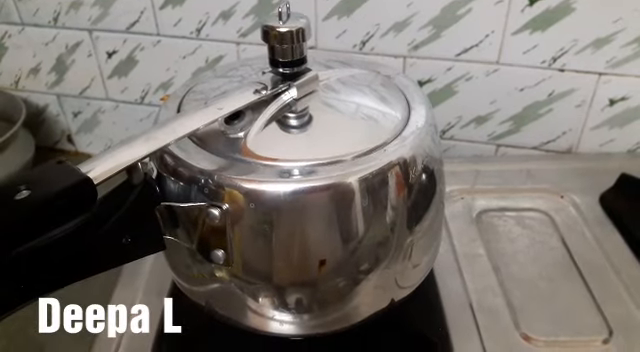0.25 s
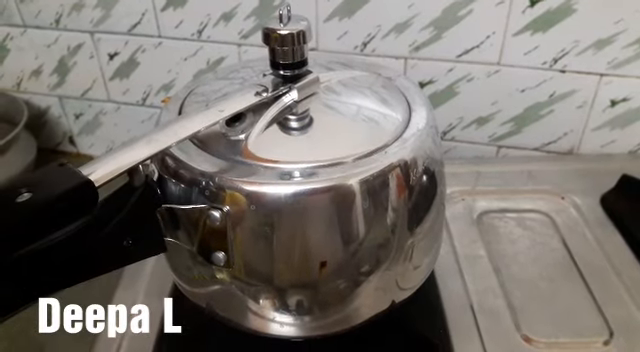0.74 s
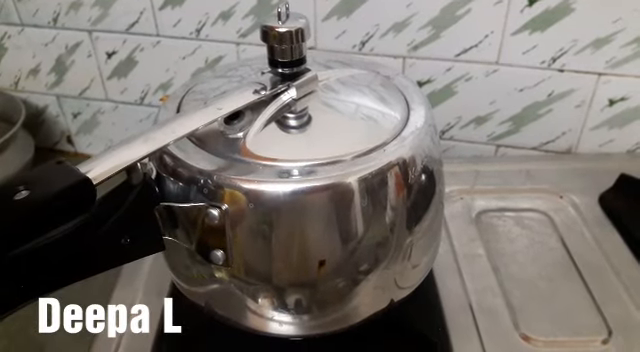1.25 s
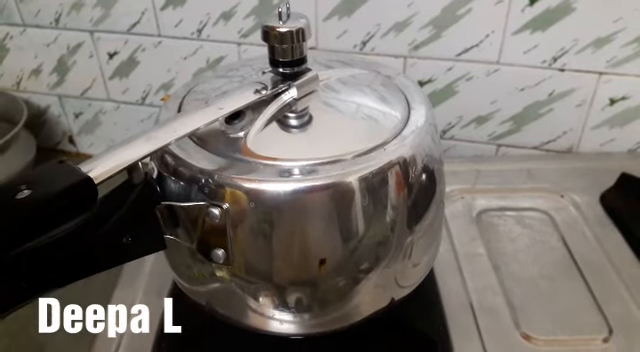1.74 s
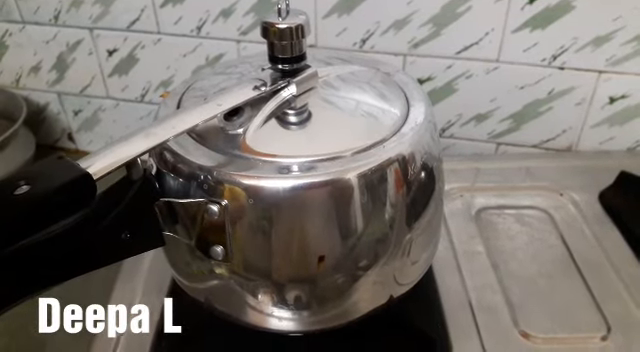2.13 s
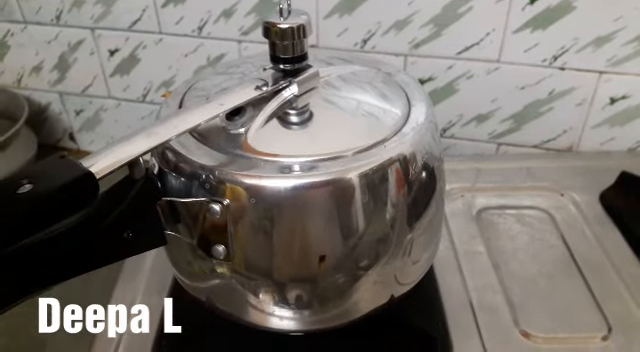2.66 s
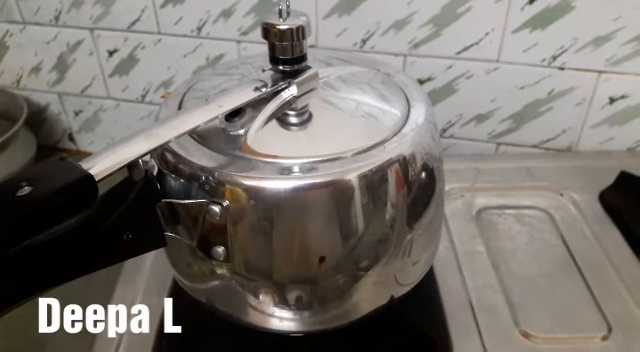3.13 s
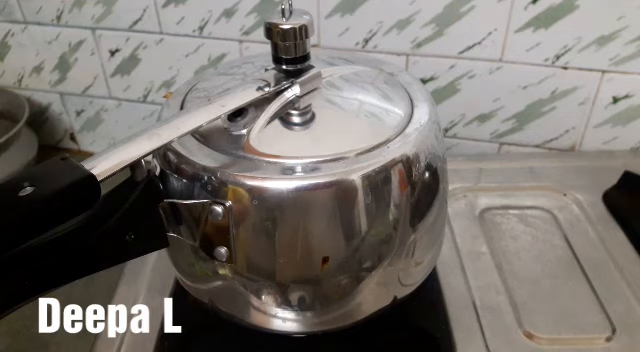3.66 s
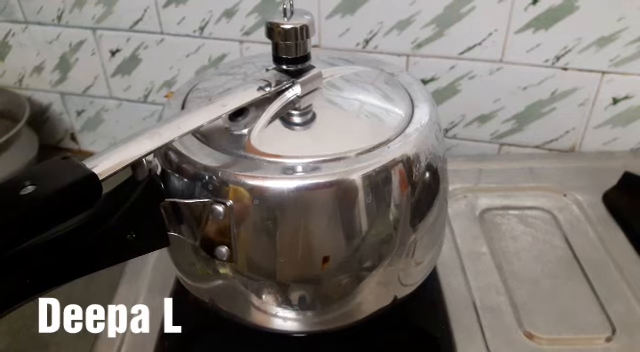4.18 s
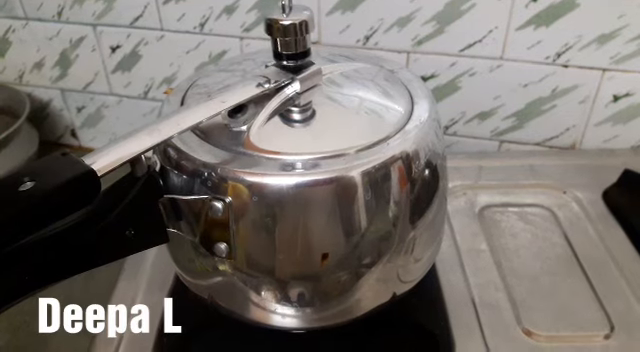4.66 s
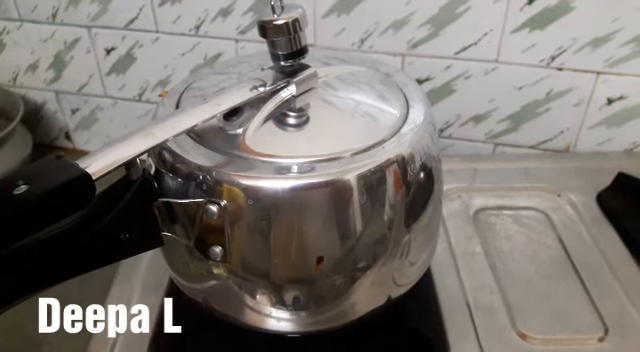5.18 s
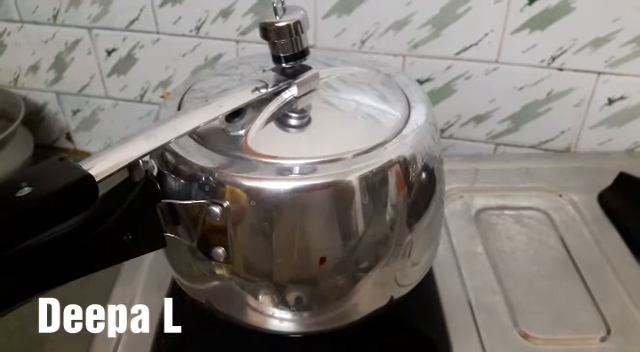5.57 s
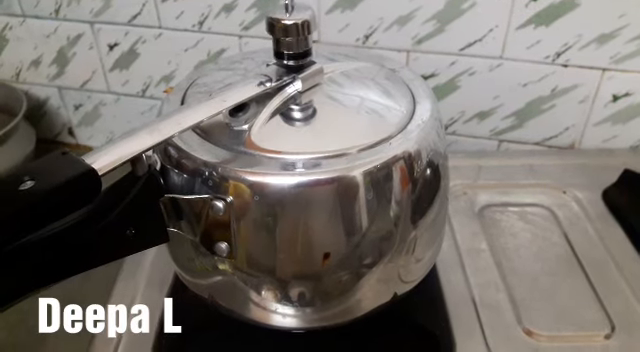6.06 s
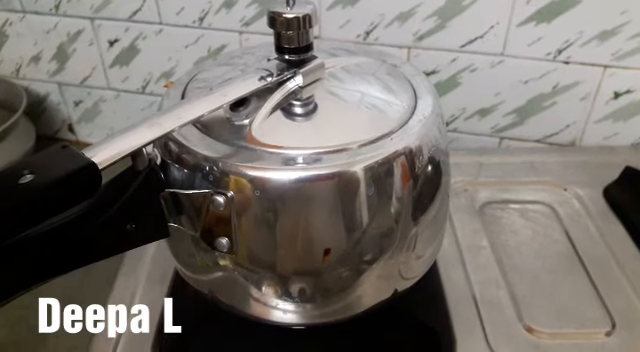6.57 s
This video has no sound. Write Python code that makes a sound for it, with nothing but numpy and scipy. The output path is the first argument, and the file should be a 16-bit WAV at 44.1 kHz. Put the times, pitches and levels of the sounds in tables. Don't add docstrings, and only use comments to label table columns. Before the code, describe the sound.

A phone microphone close to the vent picks up leaking steam, soft flame rumble, a few metallic pan taps and sharp wet spits. The hiss rocks in swelling puffs, then opens into a bright, roaring blast for over a second, full of crackling, buffeting thumps. The weight drops shut with a low bump; faint hiss and small drips remain, turned down, in a short hard-walled kitchen echo.

```python
import sys
import numpy as np
from scipy import signal
from scipy.fft import rfft, irfft, next_fast_len
from scipy.io import wavfile
from scipy.ndimage import uniform_filter1d, map_coordinates

SR = 44100
rng = np.random.default_rng(int(sys.argv[2]) if len(sys.argv) > 2 else 0)


def makeup_ratio(level_db):
    decades = np.asarray(level_db, float) / 20
    return 10 ** decades


def bounce(signal):
    frames = np.transpose(np.atleast_2d(signal))
    limited = np.clip(frames, -1, 1)
    pcm = np.round(limited * 32767).astype(np.int16)
    wavfile.write(sys.argv[1], SR, pcm)


N = 300331

# frequency [Hz], level [dB per Hz].
ROAR = [(850, -37.0), (1380, -14.5)] + [(1000, -37), (1700, -6.5), (2090, -6.0), (2350, 1), (3000, -9.5),
        (4190, -11), (4730, -11.5), (5050, -8.0), (5800, -6.5), (6430, -1.5), (7120, -3), (8040, -9),
        (12600, -12), (15700, -14.5)][1:]
# frequency [Hz], width [Hz], boost
# [dB].
CAVITY = [(2340, 140, 1.6), (5157, 82, 5), (6680, 200, 0), (7300, 150, 2), (12700, 1000, 4)]
# time [s], jet level [dB], level of its top end [dB].
PRESSURE = [(0, -35.5, -20), (.09, -40.5, -9), (.15, -39, -9), (.32, -43, -7.5), (2.1, -43, -7),
            (3.3, -42, -8), (3.58, -38.5, -9.5), (3.94, -38.5, -9), (4.3, -36.5, -11.5), (4.6, -35.5, -9),
            (5.2, -41, -11), (6.2, -43, -9), (6.44, -43, -13), (6.81, -41, -14)]

OPEN_S, SHUT_S = 4.85, 6.135


def unit(x):
    return x / np.sqrt(np.mean(x ** 2) + 1e-20)


def along(points, hz):
    f, v = np.transpose(points)
    return np.interp(np.log(hz + 1), np.log(f + 1), v)


def curves(rows):
    s, *columns = np.transpose(rows)
    return [np.interp(np.arange(N) / SR, s, column) for column in columns]


def swells(rows, floor_db, t):
    power = makeup_ratio(2 * floor_db)
    power = power + sum(makeup_ratio(2 * db - 20 * ((t - s) / np.where(t < s, rise, fall)) ** 2)
                        for s, db, rise, fall in rows)
    return 10 * np.log10(power)


def wobble(rate):
    knots = rng.standard_normal(int(N * rate / SR) + 4)
    return map_coordinates(knots, [np.arange(N) * rate / SR])


def filtered(x, response):
    m = next_fast_len(N + SR // 2)
    return irfft(rfft(x, m) * response(np.fft.rfftfreq(m, 1 / SR)), m)[..., :N]


def patchy(patchy_db):
    z = signal.stft(rng.standard_normal(N), nperseg=512)[2]
    field = uniform_filter1d(rng.standard_normal(z.shape), 6, 0)
    field = uniform_filter1d(field, 10, 1)
    return signal.istft(z * makeup_ratio(patchy_db * unit(field)), nperseg=512)[1][:N]


def room(x, wet_db):
    # frequency [Hz], time to fall by 60 dB [s].
    kitchen = [(500, 0.88), (3000, 0.26), (12000, 0.26)]
    hz, t, z = signal.stft(rng.standard_normal(SR // 2), SR, nperseg=256)
    decay = makeup_ratio(-60 * t / along(kitchen, hz)[:, None])
    tail = signal.istft(z * decay, SR, nperseg=256)[1]
    delayed = np.pad(x, (130, 0))
    return x + makeup_ratio(wet_db) * signal.fftconvolve(delayed, tail / np.linalg.norm(tail))[:N]


def vent(x, spectrum, peaks):
    # frequency [Hz], width [Hz], change [dB].
    lid_dips = [(4020, 110, -5), (4340, 140, -9)]

    def response(f):
        bumps_db = sum(db / (1 + ((f - c) / w * 2) ** 2) for c, w, db in peaks + lid_dips)
        return makeup_ratio(along(spectrum, f) + bumps_db)

    return filtered(x, response)


def duck_db():
    start_s, length_s, depth_db = 4.705, .06, -12.5
    return depth_db * np.clip((np.arange(N) / SR - start_s) / length_s, 0, 1)


def valve():
    # time [s], peak [dB], rise [s], fall [s].
    surges = [
        (2.44, -43, 0.14, .1),
        (2.815, -43.5, 0.034, .08),
        (3.064, -41, 0.079, 0.072),
        (3.5, -38, 0.19, 0.052),
        (3.816, -33.5, 0.21, 0.081),
        (4.15, -29.5, 0.15, 0.19),
        (4.44, -30, 0.14, 0.18),
        (5.5, -21, .25, 0.13),
        (6.615, -52, .008, 0.045),
    ]
    blast_level_db, kick_db, kick_s, sag_db_per_s = -16.5, 2.5, 0.11, 0.9
    rise_db_per_s, fall_db_per_s = 79, 217
    unstick_s, unstick_db_per_s = 4.65, 202
    surge_brighter_db = 4

    t = np.arange(N) / SR
    leak_db, top_db = curves(PRESSURE)
    leak_db = leak_db + duck_db()
    since = t - OPEN_S
    blast_db = blast_level_db + kick_db * np.exp(-np.maximum(since, 0) / kick_s)
    blast_db = blast_db + np.minimum(rise_db_per_s * since, -sag_db_per_s * since)
    blast_db = blast_db - fall_db_per_s * np.maximum(t - SHUT_S, 0)
    blast_db = blast_db - unstick_db_per_s * np.maximum(unstick_s - t, 0)
    jet_db = 10 * np.log10(makeup_ratio(2 * swells(surges, leak_db, t)) + makeup_ratio(2 * blast_db))
    beyond_leak = 1 - makeup_ratio(2 * (leak_db - jet_db))
    return jet_db, top_db + surge_brighter_db * beyond_leak


def steam():
    # frequency [Hz], level [dB per Hz].
    leak_colour = [(530, -33), (900, -33), (1040, -13), (1210, -25), (1320, -13.5), (2080, -5.5), (2340, 0),
                   (2610, -9.5), (2800, -8.5), (3280, -16.5), (4420, -16.5), (6800, -6.5), (8840, -16.5),
                   (12100, -19.5), (15700, -17.5)]
    # frequency [Hz], width [Hz], change [dB].
    seat_gap = [(7500, 340, 4.5), (7880, 280, -9), (12500, 360, -7), (14300, 300, -10), (15150, 400, 2)]
    jet_db, top_db = valve()
    flow = np.clip((jet_db + 43.0) / 18, 0, 1)
    air = room(patchy(patchy_db=1.2) * makeup_ratio(0.57 * wobble(300)), wet_db=-10.5)
    leak = unit(vent(air, leak_colour, CAVITY + seat_gap))
    roar = unit(vent(air, ROAR, CAVITY))
    jet = (1 - flow) * leak + flow * roar
    top = filtered(jet, lambda f: 1 / (1 + (9000 / (f + 1)) ** 8))
    top_gain = makeup_ratio(top_db + 10 - 1.17 * flow)
    return makeup_ratio(jet_db + 0.5 * wobble(12)) * (jet + (top_gain - 1) * top)


def stove():
    # frequency [Hz], level [dB per Hz].
    rumble_colour = [(20, -16), (45, -17.0)] + [(41, -37), (70, -5.5), (141, -0.5), (193, -10.5), (265, -2),
                     (397, -6.5), (640, -9.5), (900, -7.5), (1300, -9.5), (1690, -36), (2860, -120)][1:]
    # frequency [Hz], width [Hz], level [dB].
    flame_tones = [(148, 24, -6), (240, 14, -8), (268, 15, 0), (352, 20, -8), (438, 8, -12)]
    # time [s], peak [dB], rise [s], fall [s].
    flares = [(.15, -53.5, 0.18, .15), (.55, -49, .3, 0.28), (1.24, -53.5, 0.11, 0.23),
              (1.63, -54.5, 0.069, 0.18), (2.02, -53.5, .09, .13), (2.57, -51, .06, 0.14),
              (2.82, -49, 0.08, 0.089), (3.08, -53.5, .12, 0.61), (3.76, -52, 0.33, .4),
              (4.42, -50.5, 0.14, 0.041), (4.6, -49.5, 0.036, .1), (6.185, -33, .04, .08),
              (6.66, -52, .03, .15)]
    # time [s], peak [dB], rise [s], fall [s].
    settling = [
        (6.175, -44.5, 0.048, 0.099),
    ]
    quiet_rumble_db, rumble_per_leak_db, quiet_hum_db = -54, 0.66, -69.5

    t = np.arange(N) / SR
    leak_db = curves(PRESSURE)[0]
    rumble_db = quiet_rumble_db + rumble_per_leak_db * (leak_db - leak_db.min())
    rumble_db = rumble_db + 1.2 * wobble(4.1) + duck_db()
    rumble = unit(filtered(patchy(patchy_db=1.5), lambda f: makeup_ratio(along(rumble_colour, f))))

    def hum_response(f):
        return sum(makeup_ratio(db) * f * w / np.hypot(c * c - f * f, f * w) for c, w, db in flame_tones) ** 2

    hum_db = swells(flares, quiet_hum_db, t) + duck_db()
    hum = unit(filtered(rng.standard_normal(N), hum_response))
    above_300_hz = filtered(rumble, lambda f: 1 / (1 + (300 / (f + 1)) ** 8))
    settle = makeup_ratio(swells(settling, -120, t)) * above_300_hz
    return settle + makeup_ratio(rumble_db) * rumble + makeup_ratio(hum_db) * hum


def clanks():
    # time [s], level [dB].
    touch_lists = [
        [(.008, -31)],
        [(.02, -30.5), (.05, -35), (.07, -36)],
        [(.04, -35), (.05, -29), (.066, -30.5), (.08, -45), (.096, -27), (2.63, -38.5)],
        [(.202, -28), (.214, -27), (.225, -31)],
        [(3.29, -40), (3.35, -35), (3.44, -35.5), (3.74, -40)],
    ]
    # frequency [Hz], level [dB], time to fall by 60 dB [s].
    pans = [
        [(140, 0, .12), (680, -4, .05), (870, -4, .05), (4330, -8, .15), (4570, -6, .12), (4700, -8, .12)],
        [(1740, 0, .12), (2000, -5, .08), (2290, -2, .12)],
        [(910, -1, .06), (965, 1, .06), (1080, -5, .05)],
        [(1650, -2, .05), (1863, 2, .05), (2000, 1, .05), (2120, -3, .05), (2410, 1, .07), (2540, -3, .05)],
        [(727, 0, .16)],
    ]
    x, t = np.zeros(N), np.arange(SR // 2) / SR
    onset = 1 - np.exp(-t / 0.0022)
    for touches, tones in zip(touch_lists, pans):
        for s, db in touches:
            ring = np.zeros(len(t))
            for hz, level, t60 in tones:
                fade = makeup_ratio(level + rng.normal(0, 2) - 60 * t / t60)
                ring += fade * np.sin(2 * np.pi * hz * rng.normal(1, .008) * t)
            x[round(s * SR):][:len(t)] += makeup_ratio(db - 6.0) * ring * onset
    return room(x, wet_db=-5)


def spits():
    # time [s], peak [dB], width of colour [dB], puff [dB].
    droplets = [(0.0126, -29, 2, -30), (0.109, -23.5, -2, -10), (.1211, -22, 1, -6),
                (0.1242, -19, -2, -7.5), (0.153, -26, -2, -6), (.1794, -30, 4, -11), (.2288, -29, 0, -10),
                (2.28, -33, 5, -7), (2.368, -24, -2, -7), (2.376, -20, -4, -16), (2.4263, -28, -7, -15),
                (2.4567, -21.5, -1.5, -7.5), (2.591, -29.5, -1.5, -8), (2.6109, -28.5, 0, -9),
                (2.801, -22, -3, -4), (3.3387, -22, 3, -5), (3.4362, -20.5, 3, -9),
                (3.4395, -13.5, -15, -14), (3.5157, -24, 1, -17), (3.5189, -13, -2.5, -18),
                (3.523, -23, .6, -18), (3.5484, -31, .6, -10), (3.592, -22, -9, -14), (3.6322, -24, 2, -10),
                (3.7336, -27, -2, -7)]
    # time [s], peak [dB], width of colour [dB].
    drips = [(6.4601, -46, 0), (6.491, -42, -8), (6.5314, -39, -10), (6.5399, -34, -7), (6.5868, -39, -5),
             (6.6073, -33, -4), (6.619, -38, -6), (6.6252, -38, -8), (6.6285, -31, -10),
             (6.6374, -32, -8.5), (6.6746, -27.5, -4), (6.731, -40, 3), (6.775, -44, -0.5)]
    drip_puff_db, low_db, top_db = -9.5, -10.5, -16.5

    parts = np.zeros((3, N + SR))
    t = np.arange(SR // 8) / SR
    for s, db, wide_db, puff_db in droplets + [(*drip, drip_puff_db) for drip in drips]:
        envelope = makeup_ratio(-60 * t / 0.019) + makeup_ratio(puff_db - 60 * t / 0.18)
        burst = envelope * rng.standard_normal(len(t))
        band_db = np.c_[[low_db + wide_db, 0, top_db + wide_db]]
        parts[:, round(s * SR):][:, :len(t)] += makeup_ratio(db - 2.5 + band_db) * burst

    def under(f, edge_hz):
        return 1 / (1 + (f / edge_hz) ** 8)

    def bands(f):
        middle = under(f, 6870) - under(f, 4500)
        return np.array([1.4 * under(f, 3800), middle, 3.2 * (1 - under(f, 7900))])

    scale = np.std(vent(rng.standard_normal(N), ROAR, CAVITY))
    bursts = filtered(parts[:, :N], bands).sum(axis=0)
    return room(vent(bursts, ROAR, CAVITY) / scale, wet_db=-7)


def thumps():
    # time [s], peak [dB], rise [s], fall [s].
    gusts = [(4.878, -21, 0.015, 0.023), (4.92, -12.5, 0.026, .03), (4.96, -14, .03, 0.044),
             (5.036, -18, 0.024, 0.025), (5.155, -10, 0.033, .03), (5.234, -16, 0.034, 0.025),
             (5.325, -26, 0.0397, .03), (5.43, -14, 0.039, 0.044), (5.49, -16.5, 0.0079, 0.046),
             (5.58, -14, .04, 0.037), (5.65, -15.5, .04, 0.04), (5.715, -13, .03, .04),
             (5.79, -14, 0.017, 0.046), (5.86, -9, 0.012, 0.013), (5.91, -16.5, .02, .03),
             (5.968, -15.5, 0.029, 0.018), (6.02, -19.5, .012, 0.023), (6.07, -18.5, 0.046, 0.03)]
    # time [s], peak [dB], direction [1 up, -1 down, 0 down and up again].
    largest = [(4.8739, -8.5, 0), (4.882, -9, 0), (4.9195, -9.3, 1), (4.927, -6.9, 1), (4.9492, -7, 0),
               (4.959, -5.5, 0), (4.9834, -6.4, -1), (4.9922, -8.4, -1), (5.0369, -9.1, 1), (5.1481, -6, 0),
               (5.1624, -6.9, -1), (5.1656, -7.1, 1), (5.2338, -9.2, 1), (5.3233, -7.7, -1),
               (5.3403, -9, -1), (5.4531, -7.4, -1), (5.5676, -7.8, 1), (5.6262, -8, 0), (5.658, -5.5, -1),
               (5.6608, -6.5, 1), (5.6975, -7.7, 1), (5.7081, -7.8, 1), (5.7129, -8, -1), (5.8021, -8.2, 1),
               (5.8576, -8.9, 1), (5.8991, -9.5, -1), (5.9489, -9, -1), (5.9687, -9.1, 1),
               (5.9751, -8.3, -1), (6.0792, -7.3, 1)]
    lull_db, first_gust_s, rebound_s, big_db = -27.5, 4.858, .001, 1

    draw = rng.random((700, 4))
    s = first_gust_s + (SHUT_S - first_gust_s) * draw[:, 0]
    db = swells(gusts, lull_db, s) - 3 - 3.45 * np.log(draw[:, 1])
    db = np.minimum(db, -13)
    small_ms = .15 * 8.5 ** draw[:, 2] ** 1.3
    small = np.c_[s, db, np.sign(draw[:, 3] - .5), small_ms]

    big = [(s, db + big_db, way or -1) for s, db, way in largest]
    big += [(s + rebound_s, db, 1) for s, db, way in largest if way == 0]
    big_ms = rng.uniform(.36, .64, len(big))
    s, db, sign, ms = np.vstack([np.c_[big, big_ms], small]).T

    k = np.arange(-128, 128)
    shape = np.exp(-np.log(2) * np.abs(2.2 * k / SR * 1000 / ms[:, None]) ** 1.25)
    spikes = (sign * makeup_ratio(db + .8))[:, None] * shape
    places = np.round(s * SR).astype(int)[:, None] + k
    x = np.bincount(places.ravel(), spikes.ravel(), N)[:N]

    def microphone(f):
        corner_hz, damping = 92, 1.1
        port_hz, port_width_hz, port_db = 1250, 600, 3
        port = makeup_ratio(port_db / (1 + ((f - port_hz) / port_width_hz * 2) ** 2))
        return -f * f * port / (corner_hz ** 2 - f * f + 1j * damping * f * corner_hz)

    return filtered(x, microphone)


def scene():
    mono = steam() + stove() + clanks() + spits() + thumps()
    return np.array([mono, mono])


def masked(x, below_db):
    hz, t, z = signal.stft(x, SR, nperseg=2048)
    power = np.abs(z) ** 2
    band = uniform_filter1d(power, 4, 1)
    mean = np.mean(power, axis=1, keepdims=True)
    limit = makeup_ratio(2 * (below_db - .7 * (hz > 1400)))[:, None] * mean
    faint = (makeup_ratio(2 * (-94 + 1.1 * (hz - 12700) / 1000)) * (hz > 12700))[:, None]
    keep = (band > np.maximum(limit, faint))[:1]
    return signal.istft(z * keep, SR, nperseg=2048)[1][:, :N]


def top_cut(x):
    return signal.sosfilt(signal.butter(12, 16710, fs=SR, output="sos"), x)


def record(dry):
    # frequency [Hz], level [dB].
    hiss_colour = [(50, -10.5), (500, -2.5), (1500, -5.5), (2500, -9), (4000, -9.5), (7000, -19.5),
                   (12000, -9.5), (15000, -18.5)]
    level = np.sqrt(np.abs(uniform_filter1d(dry[0] ** 2, 4000)))
    hiss = unit(filtered(patchy(patchy_db=1.5), lambda f: makeup_ratio(along(hiss_colour, f))))
    residue = np.minimum(makeup_ratio(-20) * level, makeup_ratio(-68)) * hiss
    limited = dry / (1 + np.abs(dry / .9) ** 6) ** (1 / 6)
    held = limited + residue * [[1], [-1]]
    held = filtered(held, lambda f: np.clip((15830 - f) / 200, 0, 1) ** 2)
    held = held - .00064 * makeup_ratio(duck_db())
    return top_cut(masked(held, below_db=-11.7))


dry = scene()
out = record(dry)
bounce(out)
```